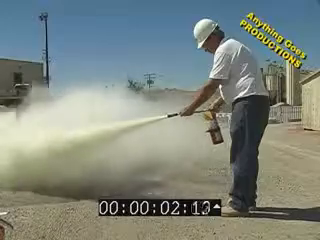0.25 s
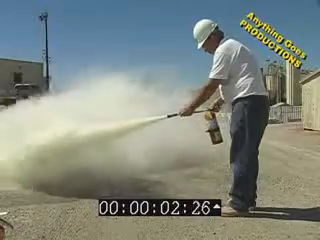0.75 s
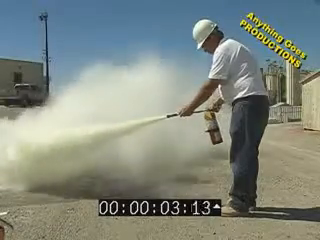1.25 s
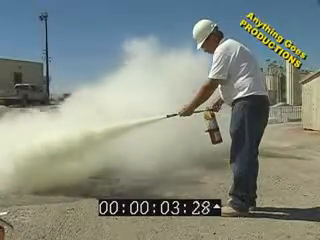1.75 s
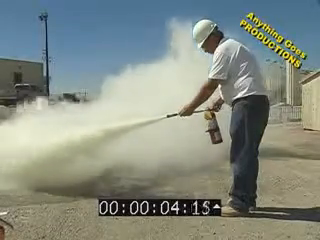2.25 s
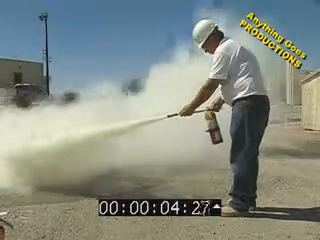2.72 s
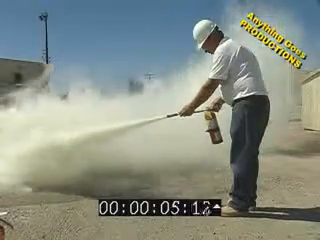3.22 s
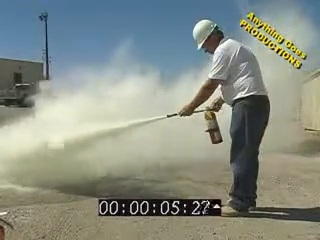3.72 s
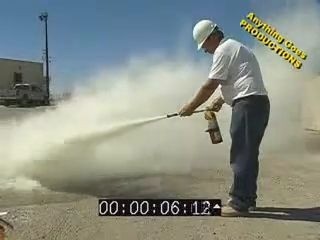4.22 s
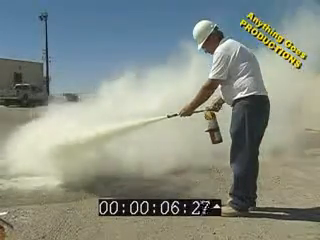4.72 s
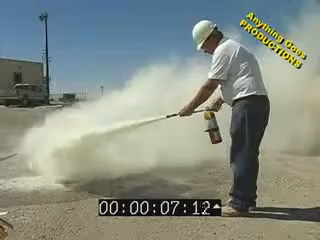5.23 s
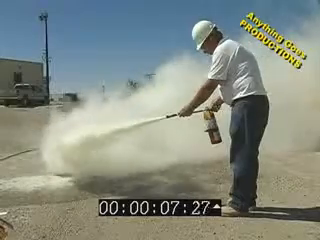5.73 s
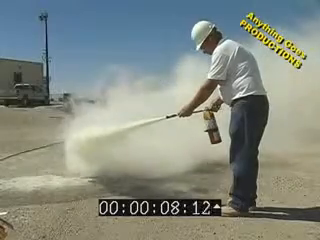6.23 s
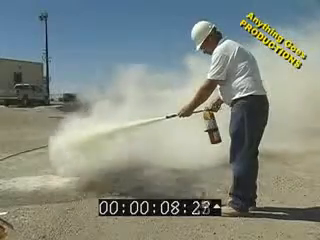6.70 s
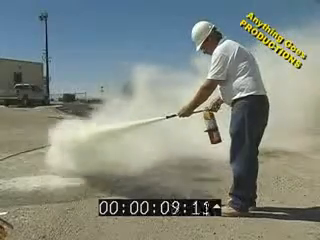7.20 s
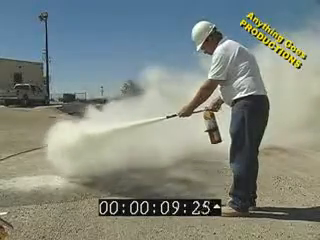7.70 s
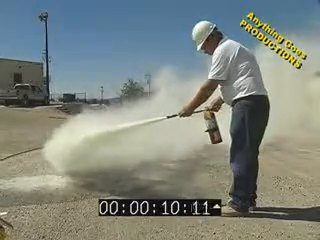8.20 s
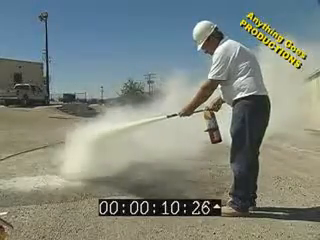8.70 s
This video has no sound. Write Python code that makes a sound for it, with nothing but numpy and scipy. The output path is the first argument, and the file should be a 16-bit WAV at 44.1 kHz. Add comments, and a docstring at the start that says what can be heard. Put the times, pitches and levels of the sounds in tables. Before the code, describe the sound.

From the start, a low, steady rumble fills an outdoor industrial yard, mixed with the hum of fans, motors and electrical equipment. Beneath it, a handheld fire extinguisher sprays powder in one unbroken jet, a soft, muted roar that seems some way off. A faint high motor whine wavers in the background, with slight airy whistling rises between about 2.5 and 5 seconds. A very deep hum swells around 3 seconds and again near 5.5. From about 4 seconds, the drone of a distant vehicle slips slightly in pitch and fades as it moves away. The spray weakens gently between 4 and 7 seconds, then carries on at that lower level until the end, near 9 seconds. The rumble stays level throughout, and the microphone adds a light hiss and faint buzz.

```python
"""Powder extinguisher in an industrial yard

A distant turbulent jet makes a soft roar that sinks as the bottle empties and its pressure falls.
Below it, plant fans, motors and transformers hum at multiples of their rotation and supply rates,
and a distant vehicle moves off. The tape camcorder that hears them adds drive hum, hiss and faint
buzz, and its notch filters cut narrow gaps where its head drum would whine."""
import sys
import numpy as np
from scipy import signal
from scipy.fft import rfft, irfft, next_fast_len
from scipy.io import wavfile

SR = 44100
rng = np.random.default_rng(int(sys.argv[2]) if len(sys.argv) > 2 else 0)


def transcribe(signal):
    """Save signal, clipped to [-1, 1], as a 16-bit WAV file at the path in sys.argv[1]."""
    frames = np.atleast_2d(signal).T
    limited = np.clip(frames, -1, 1)
    pcm = np.round(limited * 32767).astype(np.int16)
    wavfile.write(sys.argv[1], SR, pcm)


N = 394694
TIME = np.arange(N) / SR
FFT_SIZE = next_fast_len(N)
HZ = np.arange(FFT_SIZE // 2 + 1) * SR / FFT_SIZE

MAINS_HZ, FAN_HZ, SHAFT_HZ = 60.02, 58.34, 58.4875
FRAME_HZ, FIELD_HZ, DRUM_HZ, CUTOFF_HZ = 29.97, 59.94, 300, 9975
WHINE_MULTIPLE, GLIDE_START_S = 48, 4.0
HISS_DB, RUMBLE_DB, RUMBLE_RISE_DB_PER_S, MOTOR_DB = -68, -39.5, 0.03, -0.5

# Spectra of broadband noise: frequency_hz, relative_density_db
HISS_SPECTRUM = [(400, -29.5), (1000, -1.5), (2000, -1.5), (3200, 1.5), (4500, -3.5), (6500, -5.5),
                 (7700, -7), (8700, -11.5), (9400, -17), (10400, -31.5)]
RUMBLE_SPECTRUM = [(10, -31.5), (14, 0), (22, 1.5), (30, -5.5), (38, -8.5), (48, -6.5), (70, -20),
                   (84, -13), (95, -14), (110, -13.5), (135, -21.5), (170, -21), (220, -26.5), (300, -32),
                   (500, -47)]
LOWER_ROAR_SPECTRUM = [(130, -37), (250, -5), (340, 1), (450, 0.5), (540, -3), (680, -4.5), (900, -24.5)]
UPPER_ROAR_SPECTRUM = [(500, -26), (700, 0), (800, 1), (1100, -3), (1500, -4.5), (2000, -8), (3000, -24.5),
                       (5000, -42)]
# Harmonics of periodic sources: multiple, relative_level_db
PICTURE_HARMONICS = [(68, -97), (72, -99), (73, -98), (77, -101), (80, -109), (83, -100), (87, -100),
                     (88, -100), (89, -97), (91, -104), (94, -102), (95, -94), (97, -95), (101, -100),
                     (103, -102), (106, -103), (107, -103), (108, -99), (109, -103), (112, -103),
                     (114, -100), (117, -100), (118, -102), (119, -105), (120, -106), (121, -100),
                     (122, -103), (123, -95), (125, -105), (126, -103), (129, -102), (131, -106),
                     (133, -107), (138, -104), (139, -104), (140, -113), (141, -105), (142, -102),
                     (144, -108), (151, -112), (153, -108), (158, -115)]
TAPE_DRIVE_HARMONICS = [(5, -60), (19, -83), (21, -84), (23, -74), (24, -75), (32, -87), (43, -85),
                        (44, -87), (48, -90), (66, -90)]
MAINS_HARMONICS = [(4, -55.5), (6, -68), (14, -82), (26, -89), (28, -94), (36, -95)]
FAN_HARMONICS = [(3, -66), (4, -70), (7, -74), (9, -74), (10, -83), (11, -82)]
MOTOR_HARMONICS = [(24, -93), (25, -89), (28, -91), (33, -97), (35, -94), (37, -100), (40, -98), (43, -97),
                   (44, -84), (45, -86), (46, -82), (47, -87), (49, -94), (50, -88), (52, -99), (53, -87),
                   (56, -96), (57, -102), (59, -89), (60, -95)]
# Narrow noise bands, heard as breathy whistles and rings: centre_hz, width_hz, relative_level_db
STEADY_BANDS = [(163, 8, -62), (177, 8, -62), (200, 14, -65), (2045, 20, -95), (2280, 30, -94),
                (3960, 30, -96), (4280, 30, -96)]
SIZZLE_BANDS = [(5250, 30, -91), (5580, 60, -91), (5700, 30, -87.5)]
RING_BANDS = [(3167, 25, -85), (3450, 150, -84)]
COOLING_AIR_BANDS = [(2600, 260, -77.5), (2760, 80, -83), (2800, 25, -90), (2920, 40, -88)]
JET_BANDS = [(286, 10, -12), (335, 12, -8), (360, 14, -7), (495, 20, -6), (800, 30, -17), (960, 16, -20),
             (1018, 14, -19), (1080, 18, -19), (1270, 30, -19), (1350, 12, -21), (1420, 70, -17),
             (1560, 14, -24)]
# Brief rises of the rings and of the motor: centre_s, rise_db, length_s
RING_SWELLS = [(2.62, 5, .12), (3.15, 10, .12), (3.6, 5, 0.11), (4.3, 8, .2), (4.88, 5, 0.22)]
MOTOR_SWELLS = [(2.05, 4, 0.29), (2.68, 2.5, 0.18), (3.15, 2.5, 0.16), (4.45, 1.5, .45), (5.05, 2.5, 0.48),
                (7.6, 1.5, .5), (8.35, 3, 0.31), (8.9, 2.5, 0.29)]
# Envelopes of the deepest hum and of the strongest motor tone: time_s, level_db
DEEP_ENVELOPE = [(0, -39), (.3, -44.5), (.8, -37), (1.5, -40), (2.0, -43.5), (2.65, -42.5), (2.82, -31),
                 (3.3, -34), (3.55, -49), (4.0, -39.5), (4.6, -42), (5.0, -40.5), (5.33, -53.5),
                 (5.5, -32.5), (5.9, -45), (6.35, -37.5), (6.55, -43.5), (7.3, -38.5), (8.2, -38),
                 (8.95, -40.5)]
WHINE_ENVELOPE = [(0.0, -75.5), (2.27, -80.5), (2.72, -73), (2.81, -79.5), (4.13, -79), (4.66, -70),
                  (4.71, -83), (5.01, -73), (5.53, -78), (7.65, -78.5), (8.13, -83), (8.37, -79),
                  (8.92, -81), (8.95, -75)]
# Cuts at odd multiples of the drum whine: multiple, width_hz, gain_db
ODD_NOTCHES = [(3, 45, -6.5), (7, 35, -7), (9, 10, -9), (11, 40, -9), (13, 45, -8), (17, 45, -8),
               (27, 40, -8)]
# Throb near 100 Hz: time_s, pitch_hz, level_db
THROB_CURVE = [(0, 106, -55), (1, 101.1, -49.5), (1.6, 99, -53), (2.6, 100, -48.5), (4.3, 100, -47.5),
               (5.2, 99.2, -47), (6, 96.7, -52), (6.9, 105.6, -50.5), (7.7, 103, -50), (8.2, 98.5, -60.5),
               (8.95, 98.9, -60)]
# Tones of a distant vehicle, which hold their pitch, then glide down as it moves off:
# start_hz, end_hz, start_db, glide_start_db, end_db, wander_hz, waver_db
VEHICLE_TONES = [(58.45, 57, -46, -50, -48.5, 1.3, 4), (118.84, 113.5, -44.5, -46.5, -60.5, 1.1, 2),
                 (259.8, 249, -64, -61.5, -66.5, 2.2, 2.5), (648, 635, -81, -73, -88, 2.5, 1),
                 (752, 733, -69, -74, -84, 4.5, 4)]
# Decline of the jet as the bottle empties: time_s, upper_roar_db, lower_roar_db
JET_ENVELOPE = [(0, -64.5, -58.5), (.7, -66.5, -59.5), (2.8, -67, -60.5), (3.8, -66, -60.5),
                (5.2, -68.5, -62.5), (6.6, -70.5, -63.5), (8, -69.5, -64), (8.95, -68.5, -65)]


def amp(db):
    """The decibel scale: amplitude grows tenfold every 20 dB."""
    return 10 ** (np.asarray(db) / 20)


def curves(rows):
    """Linear interpolation: each column after the time gets one value per sample."""
    times, *columns = np.transpose(rows)
    return [np.interp(TIME, times, column) for column in columns]


def noise(gain):
    """Linear filtering: white noise takes on the spectrum of the gain, then is scaled to rms 1."""
    spectrum = rfft(rng.standard_normal(FFT_SIZE)) * gain
    shaped = irfft(spectrum, FFT_SIZE)[:N]
    return shaped / np.sqrt(np.mean(shaped ** 2))


def coloured(spectrum):
    """Spectral shaping: noise density follows the given points along a logarithmic frequency axis."""
    hz, db = np.transpose(spectrum)
    density_db = np.interp(np.log(HZ + 1), np.log(hz), db, left=-120, right=-120)
    return noise(amp(density_db))


def drift(rate_hz):
    """Random modulation: low-pass noise of rms 1 fluctuates slowly."""
    return noise(1 / (1 + (HZ / rate_hz) ** 2))


def swells(table):
    """Gaussian envelopes: bell-shaped rises add in dB."""
    return sum(db * np.exp(-(2 * (TIME - centre_s) / length_s) ** 2) for centre_s, db, length_s in table)


def whistles(bands):
    """Resonance: noise gathers in narrow bands, whose powers add."""
    density = sum(amp(2 * db) / width / (1 + (2 * (HZ - hz) / width) ** 2) ** 2
                  for hz, width, db in bands)
    total_power = sum(amp(2 * db) for _, _, db in bands)
    return noise(np.sqrt(density)) * np.sqrt(total_power)


def harmonics(base_hz, table, waver_db=1.0, flicker_db=0):
    """Fourier series: multiples of one rate waver together, and may flicker apart in five groups."""
    phase = 2 * np.pi * base_hz * TIME
    offsets = 2 * np.pi * rng.random(200)
    flicker = [amp(flicker_db * drift(6.6)) if flicker_db else 1 for _ in range(5)]
    series = sum(amp(db) * flicker[k % 5] * np.sin(k * phase + offsets[k]) for k, db in table)
    return np.sqrt(2) * series * amp(waver_db * drift(0.85))


def tone(hz, db, wander_hz, waver_db):
    """Frequency and amplitude modulation: a sine wanders in pitch and wavers in level."""
    phase = 2 * np.pi * np.cumsum(hz + wander_hz * drift(6.08)) / SR
    return np.sqrt(2) * amp(db + waver_db * drift(4.0)) * np.sin(phase)


def drum_notches(sound):
    """Band rejection: filters in series cut narrow gaps at multiples of the head drum's whine."""
    even_notches = [(k, 55, -9.5) for k in range(2, 34, 2)]  # multiple, width_hz, gain_db
    gain = np.ones(len(HZ))
    for k, width_hz, db in ODD_NOTCHES + even_notches:
        gain = gain * (1 - (1 - amp(db)) / (1 + 2j * (HZ - k * DRUM_HZ) / width_hz))
    return irfft(rfft(sound, FFT_SIZE) * gain, FFT_SIZE)[:, :N]


def tape_drive():
    """Structure-borne sound: the drive's hum reaches the microphone through the housing."""
    return harmonics(FRAME_HZ, TAPE_DRIVE_HARMONICS)


def plant_rumble():
    """A continuous spectrum: low noise from the plant is heard as a nearly level rumble."""
    return amp(RUMBLE_DB + RUMBLE_RISE_DB_PER_S * TIME) * coloured(RUMBLE_SPECTRUM)


def low_drones():
    """Modulation: a deep hum swells, another throbs, a vehicle's drone sinks and fades as it leaves."""
    times = [0, GLIDE_START_S, N / SR]
    vehicle = np.zeros(N)
    for start_hz, end_hz, *levels_db, wander_hz, waver_db in VEHICLE_TONES:
        pitch_hz = np.interp(TIME, times, [start_hz, start_hz, end_hz])
        vehicle += tone(pitch_hz, np.interp(TIME, times, levels_db), wander_hz, waver_db)
    deep_db, = curves(DEEP_ENVELOPE)
    deep = tone(hz=27.4, db=deep_db, wander_hz=1.786, waver_db=3)
    throb = tone(*curves(THROB_CURVE), wander_hz=3.02, waver_db=3.5)
    return deep + throb + vehicle


def plant_whistles():
    """Narrow-band noise has a breathy pitch: some bands hold steady, high ones flicker or flare."""
    steady = whistles(STEADY_BANDS)
    sizzle = whistles(SIZZLE_BANDS) * amp(1.7 * drift(8.0))
    rings = whistles(RING_BANDS) * amp(swells(RING_SWELLS) + 3.6 * drift(8.9))
    return steady + sizzle + rings


def transformers():
    """Forced vibration: the alternating supply drives a hum at even multiples of its frequency."""
    return harmonics(MAINS_HZ, MAINS_HARMONICS)


def fans():
    """Periodic motion: a fan radiates tones at multiples of its rotation rate."""
    return harmonics(FAN_HZ, FAN_HARMONICS)


def motor():
    """Rotation and flow noise: shaft harmonics and cooling air swell as the air carries them."""
    gain = amp(MOTOR_DB + swells(MOTOR_SWELLS) + 1.5 * drift(5.0))
    whine_db, = curves(WHINE_ENVELOPE)  # the strongest harmonic has a level of its own
    whine = tone(WHINE_MULTIPLE * SHAFT_HZ, whine_db, wander_hz=0.8, waver_db=1.1)
    shaft_tones = harmonics(SHAFT_HZ, MOTOR_HARMONICS, waver_db=0.33, flicker_db=2.7)
    return whine + gain * (shaft_tones + whistles(COOLING_AIR_BANDS))


def extinguisher_jet():
    """Turbulence radiates broadband noise: the roar and its faint resonances sink with the pressure."""
    upper_db, lower_db = curves(JET_ENVELOPE)
    upper_roar = amp(upper_db) * coloured(UPPER_ROAR_SPECTRUM) * amp(0.5 * drift(4.7))
    lower_roar = amp(lower_db + 0.5) * coloured(LOWER_ROAR_SPECTRUM)
    resonances = amp(lower_db) * whistles(JET_BANDS)
    return upper_roar + lower_roar + resonances


def scene():
    """Superposition: the pressures of jet, background and tape drive add at one microphone."""
    jet = extinguisher_jet()
    background = plant_rumble() + transformers() + fans() + motor() + low_drones() + plant_whistles()
    return (jet + background + tape_drive())[None]


def record(dry):
    """Additive noise and band limiting: amplifier hiss, notches, picture-circuit buzz, a steep top cut."""
    hiss = amp(HISS_DB) * coloured(HISS_SPECTRUM)
    buzz = harmonics(FIELD_HZ, PICTURE_HARMONICS, waver_db=0.7, flicker_db=2.0)
    low_pass = signal.ellip(14, 0.3, 70, CUTOFF_HZ, fs=SR, output="sos")
    return signal.sosfilt(low_pass, drum_notches(dry + hiss) + buzz)


dry = scene()
out = record(dry)
transcribe(out)
```